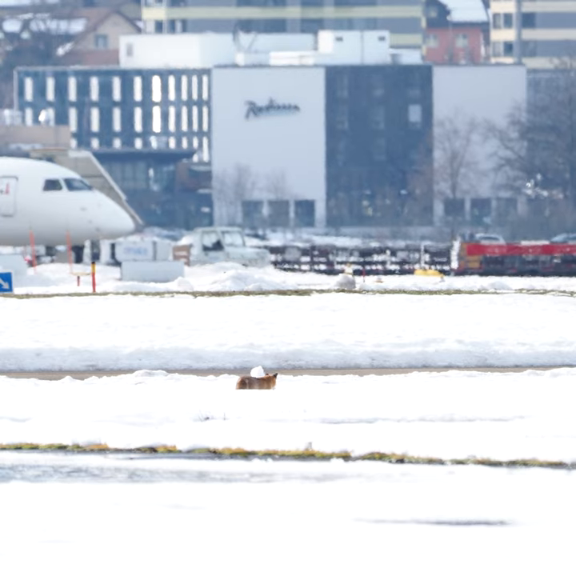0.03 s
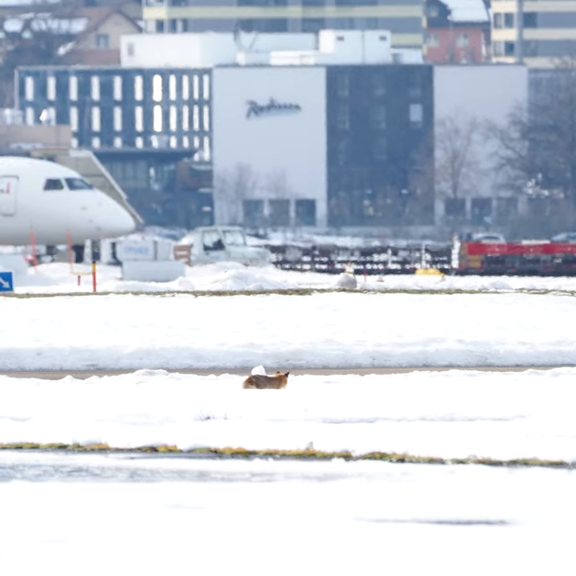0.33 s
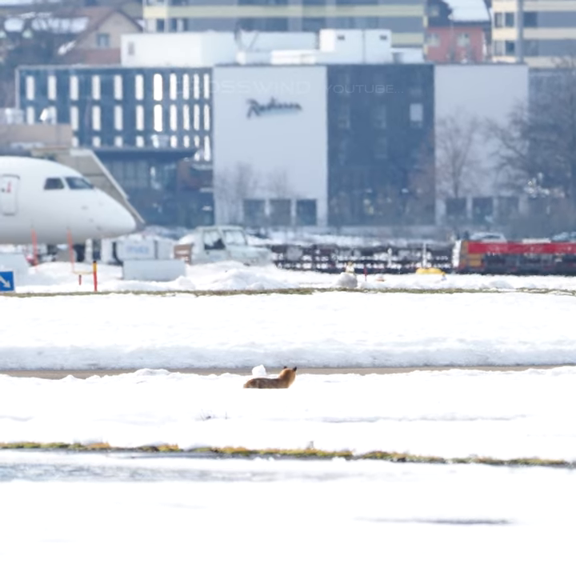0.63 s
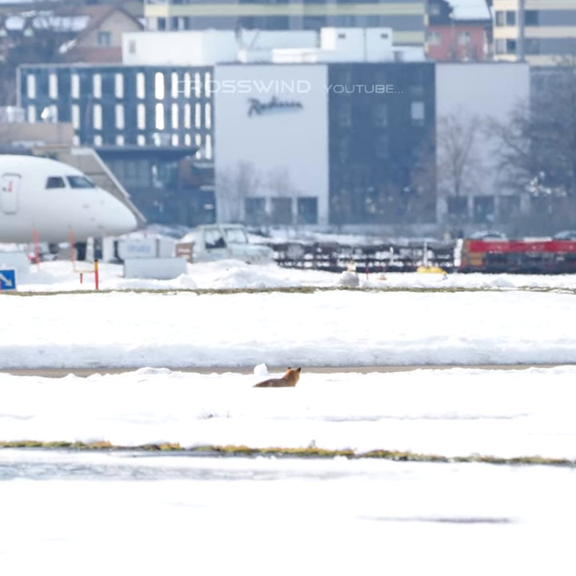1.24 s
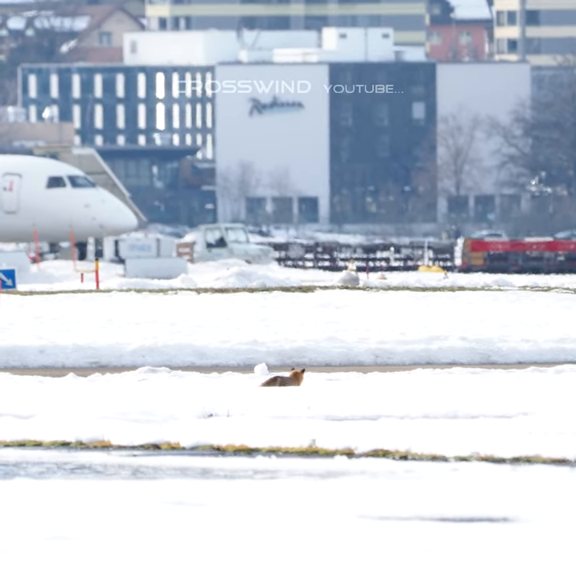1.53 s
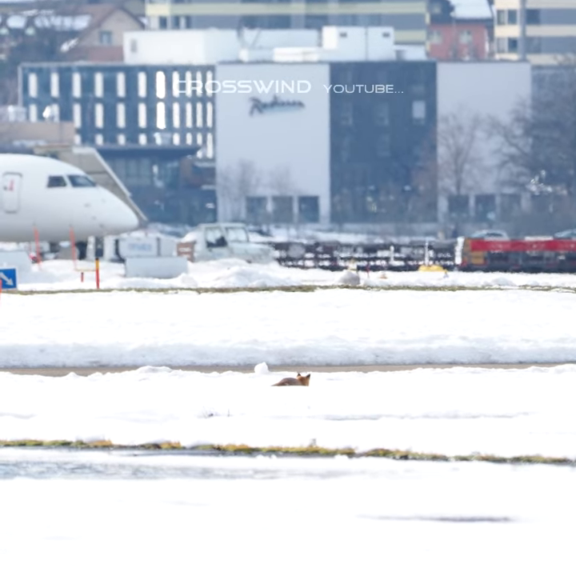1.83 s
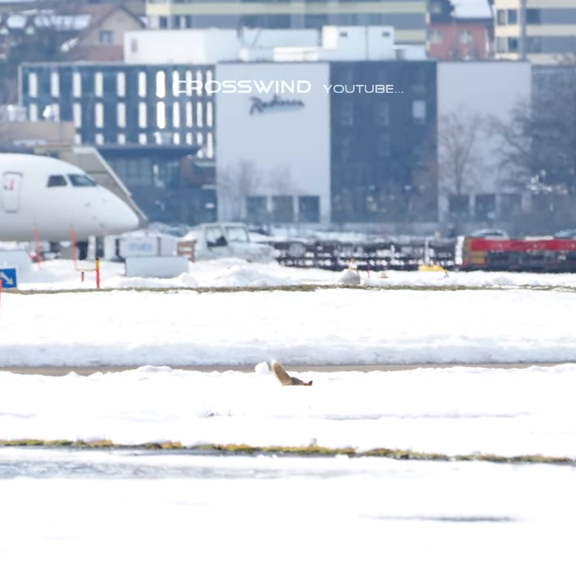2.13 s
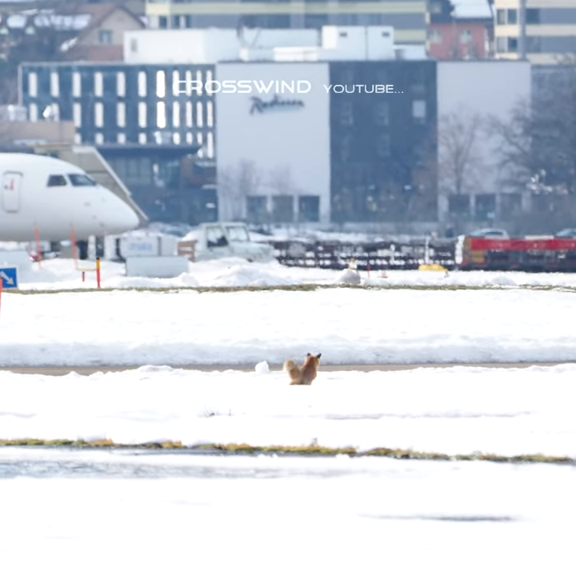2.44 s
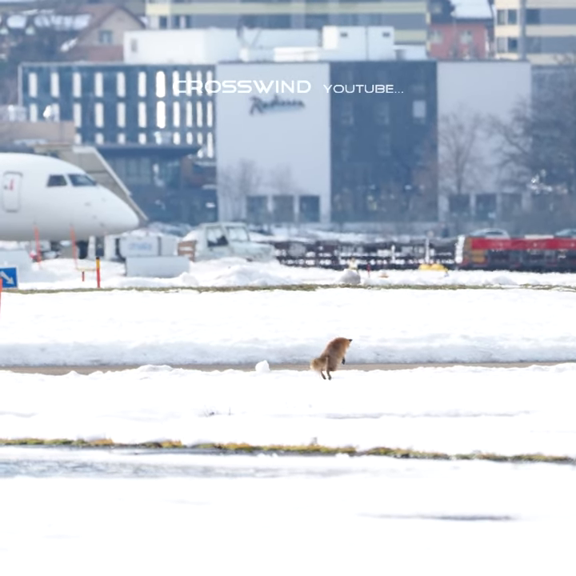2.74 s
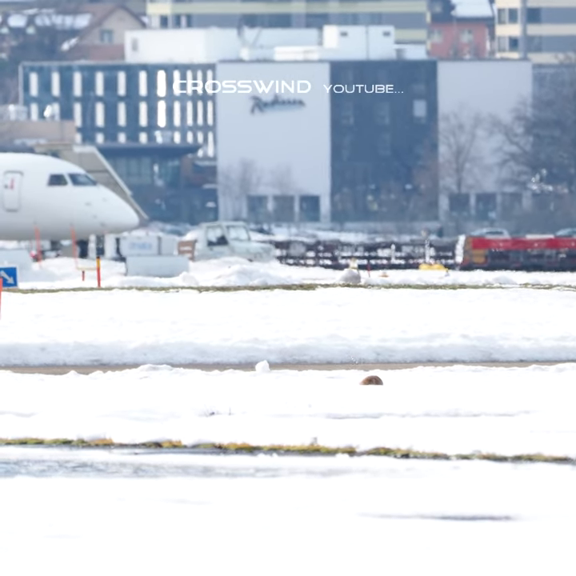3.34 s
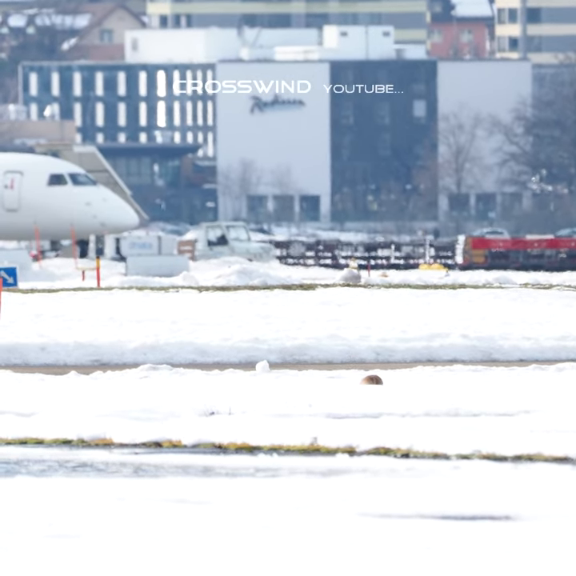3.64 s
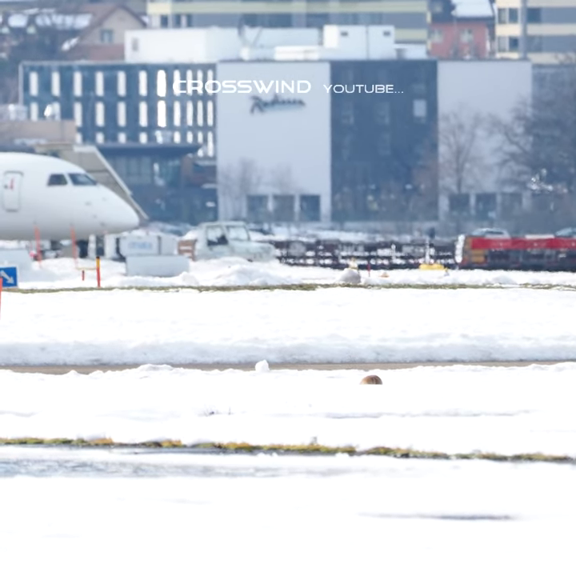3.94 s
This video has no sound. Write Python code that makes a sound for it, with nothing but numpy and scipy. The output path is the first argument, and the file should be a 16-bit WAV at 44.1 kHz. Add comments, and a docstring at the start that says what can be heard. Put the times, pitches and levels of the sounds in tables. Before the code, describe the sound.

Distant jet engines roar dully while wind gusts rumble and flutter on the microphone.

```python
"""A snowy airfield, with jet engines running far from a two-port microphone. Their exhaust is a dull roar,
patchy from the moving air, that slowly brightens; faint turbine whines waver in it, and a thin exhaust hiss
opens up near the end. Right at the microphone, gusts rumble and flutter, mostly on the left port, and now and
then an eddy thumps it. The whole sound, the microphone's own faint hiss included, fades in at the start."""
import sys
import numpy as np
from scipy import signal
from scipy.fft import rfft, irfft
from scipy.io import wavfile
from scipy.ndimage import uniform_filter1d

SR = 44100
rng = np.random.default_rng(int(sys.argv[2]) if len(sys.argv) > 2 else 0)


def waveform_to_disk(signal):
    """Save audio, clipped to [-1, 1], as 16-bit WAV at the path in sys.argv[1]."""
    frames = np.transpose(np.atleast_2d(signal))
    scaled = np.clip(frames, -1, 1) * 32767
    samples = np.round(scaled).astype(np.int16)
    wavfile.write(sys.argv[1], SR, samples)


N = 176400
T, HZ = np.arange(N) / SR, np.fft.rfftfreq(N, 1 / SR)


def amp(db):
    """Decibels to gain."""
    return 10 ** (np.asarray(db) / 20)


def unit(x):
    """Scales to rms 1."""
    return x / np.sqrt(np.mean(x ** 2) + 1e-20)


def curve(rows, t=T, column=1):
    """One column of a table over time."""
    rows = np.array(rows)
    return np.interp(t, rows[:, 0], rows[:, column])


def colour(rows, hz=HZ, column=1):
    """One column of a table over log frequency."""
    rows = np.array(rows)
    return np.interp(np.log(hz + 1), np.log(rows[:, 0] + 1), rows[:, column])


def noise(gain):
    """Noise with the given amplitude per root Hz."""
    return irfft(rfft(rng.standard_normal(N)) * gain, N) * np.sqrt(SR / 2)


def wander(rate_hz):
    """A smooth random drift of rms 1."""
    return unit(noise(np.exp(-.5 * (HZ / rate_hz) ** 2)))


# The far roar at the right port. Each row: frequency in Hz, dull and bright levels in dB per Hz.
ROAR_SPECTRUM = [(64, -55.5, -59.5), (267, -86, -89.5), (380, -67.5, -76), (505, -79.5, -72.5),
                 (644, -69, -70), (812, -75.5, -75.5), (987, -67.5, -67), (1220, -79.5, -68.5),
                 (1356, -73, -71.5), (1980, -82.5, -76), (2230, -79, -71.5), (3060, -86, -74),
                 (3166, -85, -87.5), (3660, -85.5, -91.5), (4280, -101.5, -96.5), (4300, -108, -100),
                 (4900, -117, -110), (6150, -134, -130), (7500, -150, -150)]
# Its drift. Each row: time in seconds, gain in dB, brightness 0-1, gain above the treble edge in dB.
ROAR_DRIFT = [(0, -0.5, 0.06, 3.5), (.45, 1.5, 0.06, 3.5), (.75, 2, 0, 0), (1.05, -1.5, 0.18, 4),
              (1.55, 2.5, 0, -3.5), (1.85, 2, 0.38, -1.5), (2.15, -.5, 0.6, 2.5), (2.5, 2, 0.54, 4.5),
              (2.8, -1.5, 0.73, 3.5), (3.15, 2, 0.73, 1.5), (3.55, 2.5, 0.75, -3), (3.85, 3, 0.82, 2.5),
              (4, 3.5, 0.7, 1)]
# Its highest hiss. Each row: time in seconds, added gain in dB.
ROAR_TOP_GAIN = [(0, 2), (.5, 2), (1, 6), (1.4, 11.5), (1.9, 6), (2.3, 3), (2.6, 3), (3, 3), (3.55, 5),
                 (3.8, 4), (4, 4)]
# How the engines reach the two ports.
# Each row: frequency in Hz, left minus right in dB, left lead in radians, coherence 0-1.
PORT_ARRIVAL = [(400, 2, 0.7, 0.82), (910, 3, 0.53, 0.94), (1240, 0.5, 0.73, 0.89), (1710, 1, 1.22, 0.8),
                (2030, 2.5, 1.96, 0.93), (2580, 6.5, 1.84, 0.82), (3320, 3, 1.92, 1),
                (3740, 1.5, 2.12, 0.97), (4740, -1, 3.3, 1), (5670, 8.5, 3.2, 1)]
TREBLE_EDGE_HZ, TOP_EDGE_HZ = (3130, 3200), (3900, 4600)  # each gain ramps in across its span


def left_port_response(hz):
    """Gain and phase of the engines at the left port, relative to the right."""
    return amp(colour(PORT_ARRIVAL, hz)) * np.exp(1j * colour(PORT_ARRIVAL, hz, column=2))


def jet_roar(patch_db=1.19, swell_db=0.17):
    """Exhaust noise from across the airfield, made patchy by the moving air, arriving at both ports."""
    frames = dict(fs=SR, nperseg=2048, noverlap=1536)
    white = rng.standard_normal((2, N)) * np.sqrt(SR / 2)
    hz, t, (independent, right) = signal.stft(white, **frames)
    hz = hz[:, None]
    patches = uniform_filter1d(rng.standard_normal(right.shape), size=9, axis=0)  # across frequency
    patches = unit(uniform_filter1d(patches, size=12, axis=1))  # across time
    bright = curve(ROAR_DRIFT, t, column=2)
    db = colour(ROAR_SPECTRUM, hz) * (1 - bright) + colour(ROAR_SPECTRUM, hz, column=2) * bright
    db += curve(ROAR_DRIFT, t) + patch_db * patches
    db += np.interp(hz, TREBLE_EDGE_HZ, (0, 1)) * curve(ROAR_DRIFT, t, column=3)
    db += np.interp(hz, TOP_EDGE_HZ, (0, 1)) * curve(ROAR_TOP_GAIN, t)
    coherence = colour(PORT_ARRIVAL, hz, column=3)
    left = (coherence * right + np.sqrt(1 - coherence ** 2) * independent) * left_port_response(hz)
    _, ports = signal.istft(np.array([left, right]) * amp(db), **frames)
    return ports[:, :N] * amp(swell_db * wander(rate_hz=9.3))


WHINE_HZ = (429, 996, 2865, 4297)
# The far turbines, a row per pitch. Each row: width in Hz, levels in dB with a dull and a bright roar.
BLADE_TONES = [(7, -57, -52.5), (40, -52.5, -71.5), (4.97, -61, -55.5), (6, -96.5, -72.5)]


def turbine_whines():
    """Blade tones that waver on their long way through the air."""
    ports, bright = np.zeros((2, N)), curve(ROAR_DRIFT, column=2)
    for hz, (width_hz, dull_db, bright_db) in zip(WHINE_HZ, BLADE_TONES):
        waver = wander(width_hz / 2) + 1j * wander(width_hz / 2)
        tone = waver * np.exp(2j * np.pi * hz * T) * amp(dull_db + (bright_db - dull_db) * bright)
        ports += np.array([tone * left_port_response(hz), tone]).real
    return ports


def turbulence(spectrum, rolloff_hz=2470):
    """Pressure noise at a port, its treble rolled off and its slow level even for a gust to shape."""
    pressure = noise(amp(colour(spectrum)) / (1 + (HZ / rolloff_hz) ** 2))
    slow_power = uniform_filter1d(uniform_filter1d(pressure ** 2, size=2000), size=2000)
    return pressure / np.sqrt(slow_power + 1e-20)


# Small eddies on the microphone. Each row: frequency in Hz, relative level in dB.
EDDY_SPECTRUM = [(60, -55.5), (130, -7.5), (190, -3), (300, -1), (400, -11), (500, -20), (700, -25),
                 (1200, -34), (2500, -49.5), (8000, -67)]


def flutter(lump_db=4.5):
    """Small eddies reach a port in quick lumps."""
    return unit(turbulence(EDDY_SPECTRUM) * amp(lump_db * wander(rate_hz=60)))


# The wind's deep roll and its rumble at each port. Each row: frequency in Hz, relative level in dB.
ROLL_SPECTRUM = [(8, -12), (25, -7), (45, 2.5), (65, 1), (90, -7.5), (150, -34.5), (500, -62.5)]
LEFT_RUMBLE_SPECTRUM = [(8, -28), (25, -9), (50, -8.5), (80, 1.5), (130, 0.5), (180, -6.5), (260, -17),
                        (450, -48), (1000, -82)]
RIGHT_RUMBLE_SPECTRUM = [(8, -16.5), (40, -8), (80, 2.5), (110, -1.5), (160, -5), (250, -14.5),
                         (400, -26.5), (1000, -59.5), (5000, -100)]
# Roll, gusts and flutter right on the ports. Each row: time in seconds, relative level in dB.
LEFT_ROLL_LEVEL = [(0, -18), (.2, -26), (.3, -24.5), (.55, -22), (.67, -23.5), (.8, -22), (.97, -17.5),
                   (1.03, -22.5), (1.11, -19.5), (1.24, -33), (1.33, -27), (1.43, -24.5), (1.57, -28),
                   (1.62, -34), (1.72, -21.5), (1.8, -24.5), (1.88, -17), (2.03, -22.5), (2.12, -21),
                   (2.52, -27.5), (2.6, -19), (2.68, -22), (2.9, -26), (2.97, -21), (3.07, -29),
                   (3.17, -21.5), (3.3, -24.5), (3.44, -27), (3.53, -24.5), (3.66, -22.5), (3.83, -16),
                   (4, -25)]
LEFT_GUST_LEVEL = [(0, -27), (.2, -26.5), (.37, -23), (.44, -26.5), (.5, -17.5), (.57, -25), (.63, -21.5),
                   (.75, -25), (.83, -21), (.88, -28), (.96, -25), (1.04, -26), (1.12, -17.5),
                   (1.19, -20.5), (1.26, -35), (1.34, -18), (1.46, -30), (1.56, -22.5), (1.66, -22),
                   (1.75, -29.5), (1.9, -20), (1.97, -22.5), (2.1, -18), (2.18, -23.5), (2.36, -22),
                   (2.53, -24.5), (2.6, -22.5), (2.68, -22), (2.77, -28), (2.96, -19.5), (3.08, -27.5),
                   (3.22, -21.5), (3.3, -24), (3.4, -17.5), (3.49, -18.5), (3.56, -25.5), (3.65, -23),
                   (3.72, -27), (3.82, -23.5), (3.9, -28.5), (4, -24.5)]
LEFT_FLUTTER_LEVEL = [(0, -32), (.21, -45.5), (.24, -36), (.33, -39.5), (.47, -40.5), (.6, -32), (.66, -38),
                      (.74, -28.5), (.8, -33), (.87, -37), (.905, -30.5), (.93, -45.5), (.96, -30),
                      (1.04, -50), (1.15, -43), (1.27, -48), (1.33, -31), (1.42, -39.5), (1.49, -36),
                      (1.55, -42), (1.66, -34), (1.74, -40), (1.84, -42), (1.9, -25.5), (1.97, -36.5),
                      (2.03, -27.5), (2.13, -34.5), (2.17, -33.5), (2.25, -27.5), (2.3, -31.5), (2.43, -37),
                      (2.53, -37), (2.6, -27), (2.66, -41.5), (2.71, -31), (2.77, -41.5), (2.83, -31),
                      (2.9, -38.5), (2.97, -34), (3.13, -47), (3.2, -31.5), (3.32, -34), (3.42, -36),
                      (3.55, -39), (3.67, -29), (3.77, -40.5), (4, -43)]
RIGHT_ROLL_LEVEL = [(0, -42), (.3, -39), (.6, -32), (.82, -30), (1, -31), (1.12, -43), (1.25, -37),
                    (1.4, -34), (1.57, -30), (1.9, -30.5), (2.1, -31.5), (2.38, -26.5), (2.52, -32),
                    (2.66, -33), (2.85, -30), (3.1, -34), (3.27, -21.5), (3.35, -33), (3.43, -22.5),
                    (3.52, -40), (3.68, -39), (3.82, -14.5), (3.88, -27), (3.94, -12.5), (4, -28)]
RIGHT_GUST_LEVEL = [(0, -44), (.5, -45), (.58, -34.5), (.74, -47), (.81, -41), (.92, -42), (1.1, -51),
                    (1.3, -48), (1.63, -48), (1.8, -36), (1.84, -35), (1.88, -25.5), (1.96, -47),
                    (2.02, -38), (2.2, -44.5), (2.38, -37), (2.5, -43), (2.9, -44.5), (3.18, -42),
                    (3.27, -31), (3.33, -45.5), (3.41, -31), (3.55, -46), (3.8, -45), (4, -44)]


def wind():
    """Each port has its own turbulence: a deep roll, a rumble and a flutter above them."""
    left = turbulence(ROLL_SPECTRUM) * amp(curve(LEFT_ROLL_LEVEL))
    left += turbulence(LEFT_RUMBLE_SPECTRUM) * amp(curve(LEFT_GUST_LEVEL) + 2)
    left += flutter() * amp(curve(LEFT_FLUTTER_LEVEL) + 6)
    right = turbulence(ROLL_SPECTRUM) * amp(curve(RIGHT_ROLL_LEVEL) + 0.5)
    right_gusts = turbulence(RIGHT_RUMBLE_SPECTRUM) * amp(1.5) + flutter() * amp(-11.5)
    right += right_gusts * amp(curve(RIGHT_GUST_LEVEL))
    return np.array([left, right])


def eddy_time_squared(peak_s, hz, steepness=1.35):
    """Squared time from an eddy's peak, in its own widths: the front is steeper than the back."""
    t = (T - peak_s) * np.where(T < peak_s, steepness, 1 / steepness)
    return np.minimum((np.pi * hz * t) ** 2, 400)


# Big eddies hitting the left port. Each row: peak time in seconds, strength in dB, centre in Hz.
BIG_EDDIES = [(0.2337, -13.5, 273), (.304, -12.5, 217), (0.483, -10.5, 129), (.589, -10, 150),
              (0.7033, -5, 145), (.748, -14.5, 343), (0.7967, -4.5, 210), (0.8283, -8.5, 200),
              (0.9037, -3, 151), (0.9554, -9, 150), (1.0986, -7.5, 97), (1.311, -9.5, 189),
              (1.325, -11.5, 179), (1.489, -14.5, 294), (1.5607, -8, 117), (1.6551, -7.5, 153),
              (1.8578, -9.5, 53.7), (1.8973, -6.7, 101), (1.9134, -5, 180), (2.0267, -4.5, 102),
              (2.0591, -5.5, 187), (2.093, -14.5, 330), (2.1245, -8, 138), (2.1383, -7, 178),
              (2.2388, -9, 187), (2.2522, -12.5, 300), (2.43, -14, 282), (2.4691, -11, 89),
              (2.5872, -7.5, 66), (2.5944, -12, 640), (2.6101, -5.5, 207), (2.706, -11.5, 197),
              (2.8206, -7.5, 200), (3.1733, -15, 153), (3.2434, -9, 160), (3.354, -10.5, 159),
              (3.4064, -7.5, 120), (3.418, -6.5, 107), (3.664, -7.5, 150), (3.8285, -7, 80)]
# The port's tick under a hard thump. Each row: frequency in Hz, relative level in dB.
PORT_TICK_SPECTRUM = [(2000, -23), (5000, -7), (7000, -0.5), (11500, 2.5), (13500, -13)]
TICK_DB, TICK_DB_PER_DB, TICK_HALF_S = -44.5, 2.6, .0006


def eddy_thumps(gain_db=2, rebound=.6):
    """Single eddies: a short push or pull with a rebound each side; the hardest make the port tick."""
    left, tick_envelope = np.zeros(N), np.zeros(N)
    for (peak_s, db, hz), sign in zip(BIG_EDDIES, rng.choice([-1, 1], len(BIG_EDDIES))):
        time_squared = eddy_time_squared(peak_s, hz)
        left += sign * amp(db + gain_db) * (1 - 2 * rebound * time_squared) * np.exp(-time_squared)
        triangle = np.maximum(1 - abs(T - peak_s) / (2 * TICK_HALF_S), 0)
        tick_envelope += amp(TICK_DB + TICK_DB_PER_DB * db) * triangle
    left += tick_envelope * unit(noise(amp(colour(PORT_TICK_SPECTRUM))))
    return np.array([left, np.zeros(N)])


def wind_dip():
    """The left wind noise dips briefly under each thump, so the thump stands out."""
    left = np.ones(N)
    for peak_s, _, hz in BIG_EDDIES:
        left *= 1 - np.exp(-eddy_time_squared(peak_s, hz) / 2)
    return np.array([left, np.ones(N)])


# Thin hiss from the far exhaust. Each row: frequency in Hz, level in dB per Hz.
EXHAUST_HISS_SPECTRUM = [(2000, -115), (3500, -90), (4300, -96), (5000, -101), (6500, -122), (9000, -150)]
# Its rise. Each row: time in seconds, gain in dB.
EXHAUST_HISS_GAIN = [(0, -30.5), (3.5, -15.5), (3.72, -6), (4, 0.5)]


def exhaust_hiss():
    """A thin exhaust hiss that opens up near the end, diffuse at the two ports."""
    ports = np.array([noise(amp(colour(EXHAUST_HISS_SPECTRUM))) for _ in range(2)])
    return ports * amp(curve(EXHAUST_HISS_GAIN))


def scene():
    """Far engines behind the wind at the microphone."""
    engines = jet_roar() + exhaust_hiss() + turbine_whines()
    return engines + wind() * wind_dip() + eddy_thumps()


# The microphone's own hiss. Each row: frequency in Hz, level in dB per Hz.
MIC_HISS_SPECTRUM = [(3000, -110), (5800, -109), (6400, -113), (7300, -110.5), (8400, -114.5), (9800, -113),
                     (11300, -118), (13700, -114), (14400, -119), (15000, -116), (16000, -121)]
# The drift of that hiss, and the fade-in of the whole sound. Each row: time in seconds, gain in dB.
MIC_HISS_GAIN = [(0, 0), (.3, 1), (.6, 4), (.75, 2.5), (.97, .3), (1.9, 2.5), (2.2, 1), (3, 2), (4, 3.8)]
FADE_IN = [(0, -77), (.075, -58), (.1, -18.5), (.15, -11.5), (.22, -6.5), (.32, -3.5), (.45, -2)]
BAND_LIMIT_HZ = 15700


def record(dry):
    """Microphone hiss, the fade-in and the band limit."""
    hiss = np.array([noise(amp(colour(MIC_HISS_SPECTRUM))) for _ in dry])
    faded = (dry + hiss * amp(curve(MIC_HISS_GAIN))) * amp(curve(FADE_IN))
    lowpass = signal.firwin(511, BAND_LIMIT_HZ, window=("kaiser", 9), fs=SR)
    return signal.oaconvolve(faded, lowpass[None], "same")


dry = scene()
out = record(dry)
waveform_to_disk(out)
```